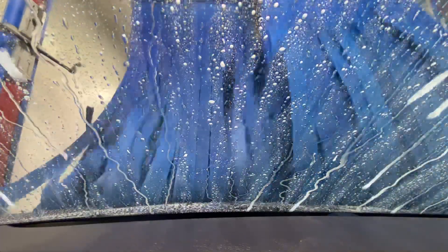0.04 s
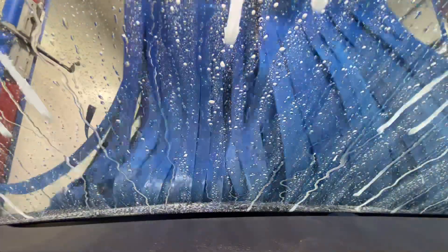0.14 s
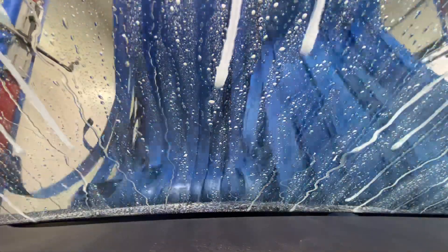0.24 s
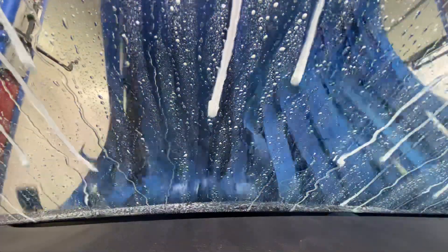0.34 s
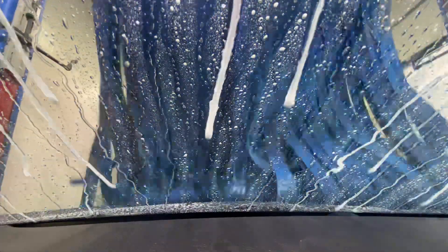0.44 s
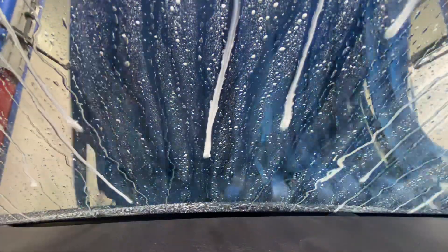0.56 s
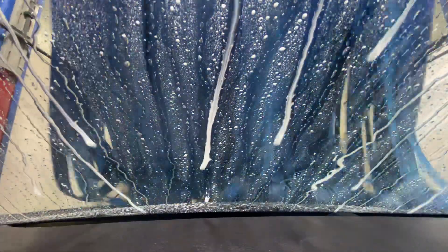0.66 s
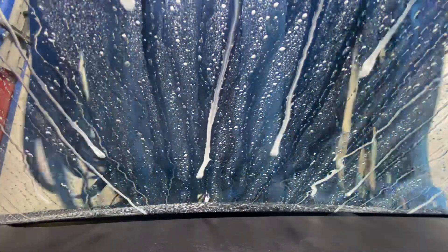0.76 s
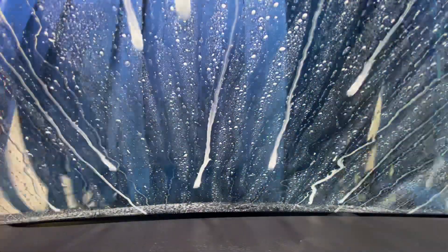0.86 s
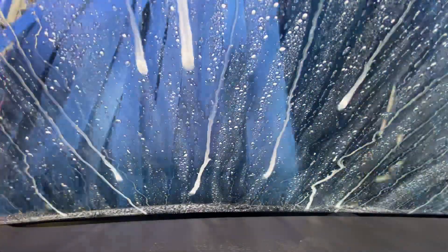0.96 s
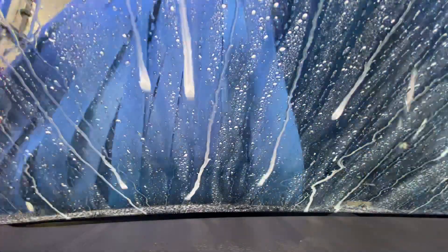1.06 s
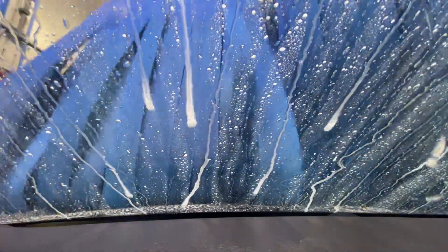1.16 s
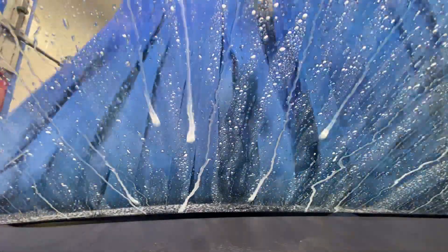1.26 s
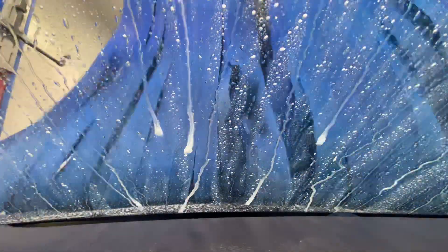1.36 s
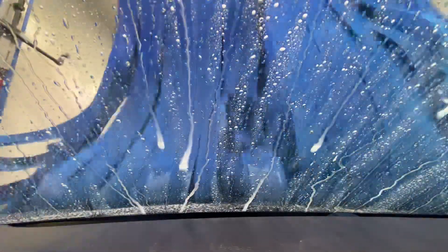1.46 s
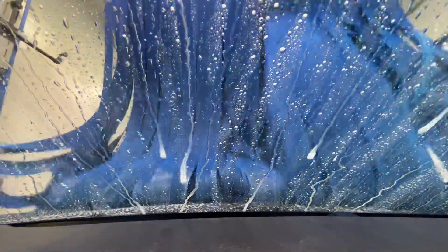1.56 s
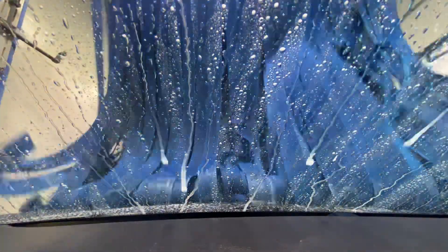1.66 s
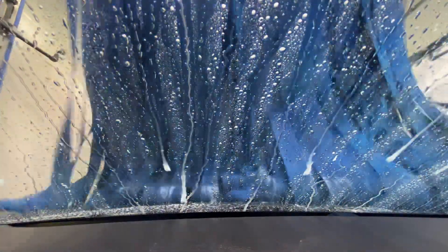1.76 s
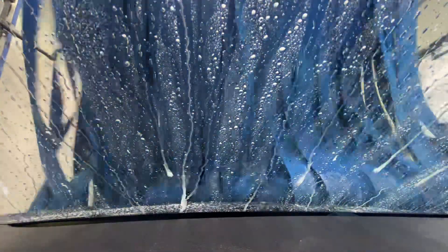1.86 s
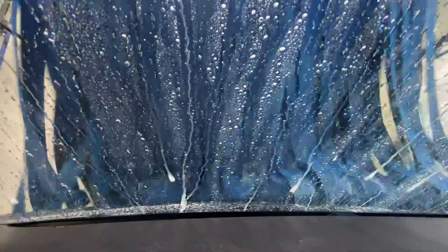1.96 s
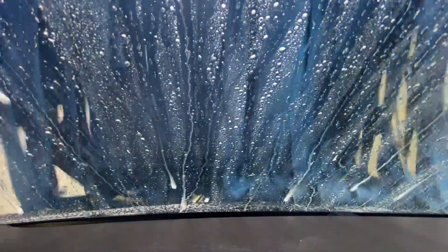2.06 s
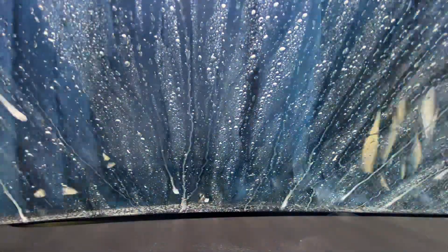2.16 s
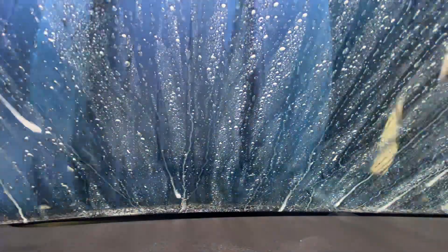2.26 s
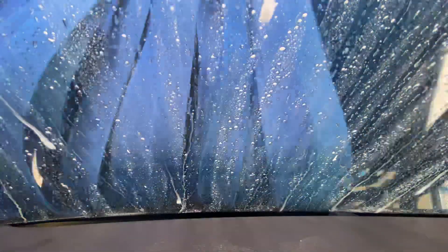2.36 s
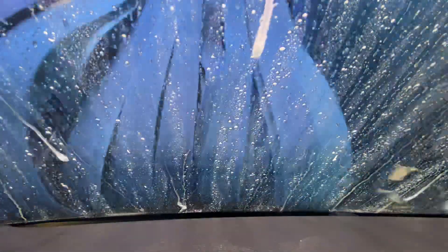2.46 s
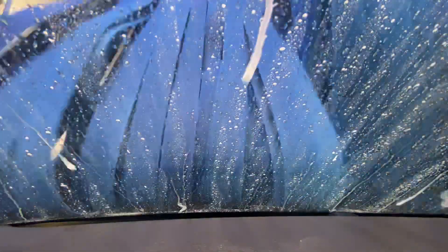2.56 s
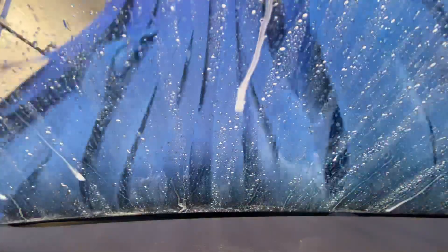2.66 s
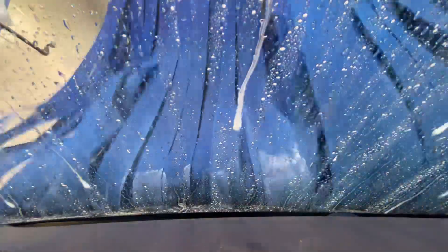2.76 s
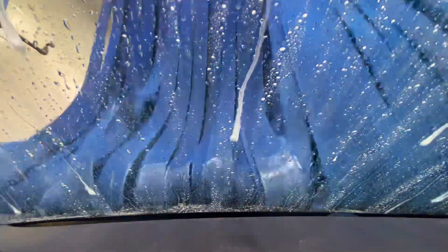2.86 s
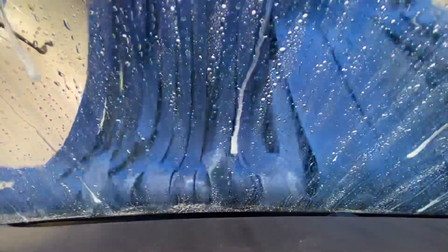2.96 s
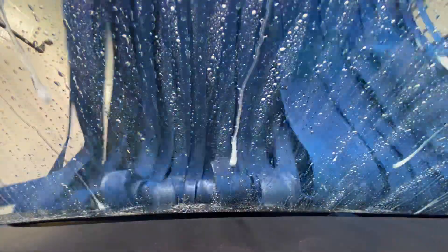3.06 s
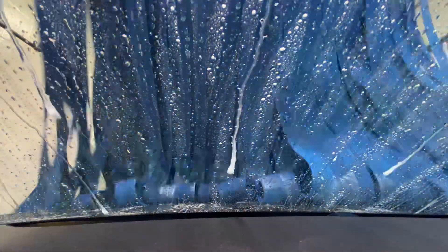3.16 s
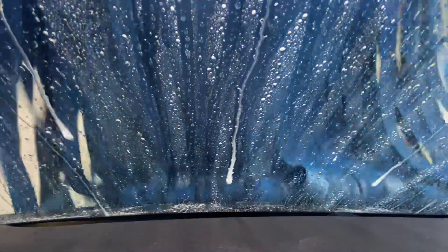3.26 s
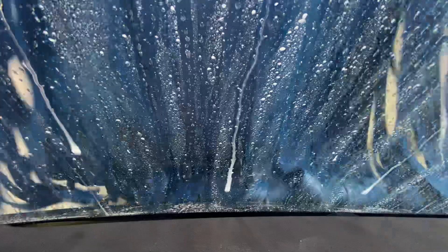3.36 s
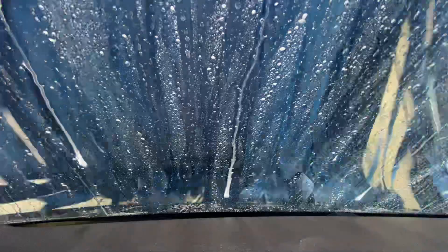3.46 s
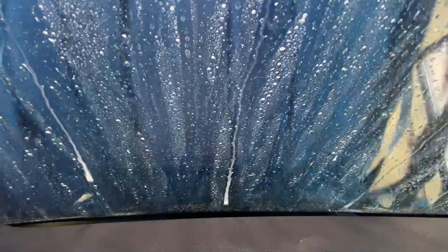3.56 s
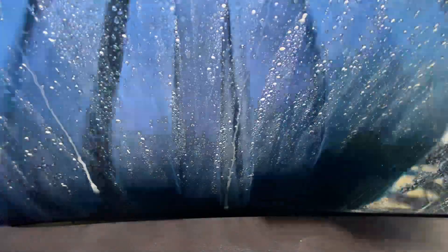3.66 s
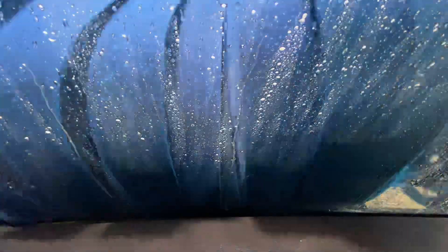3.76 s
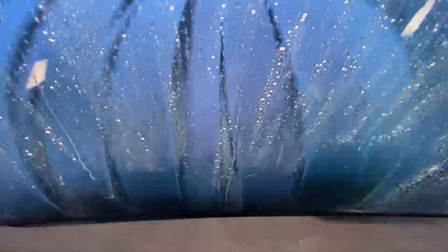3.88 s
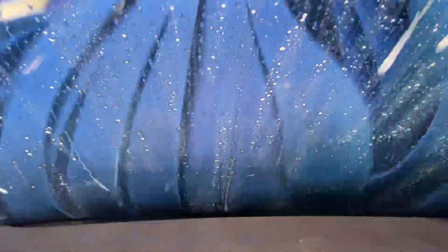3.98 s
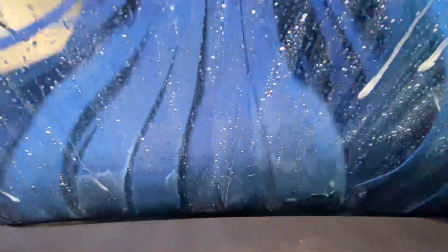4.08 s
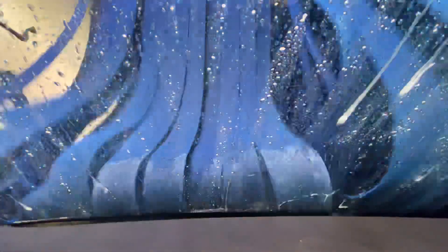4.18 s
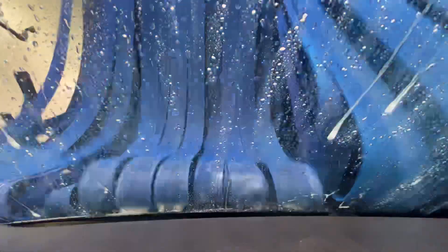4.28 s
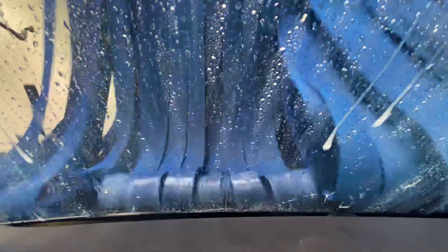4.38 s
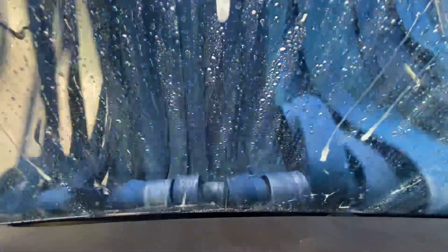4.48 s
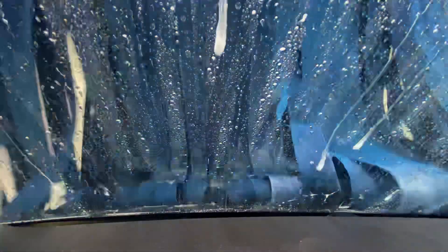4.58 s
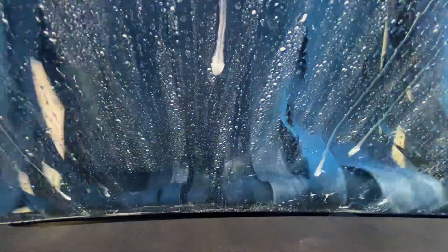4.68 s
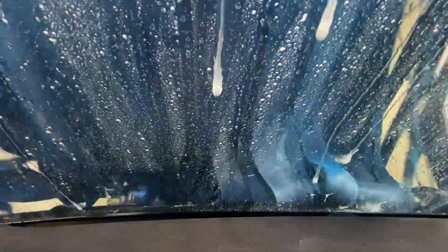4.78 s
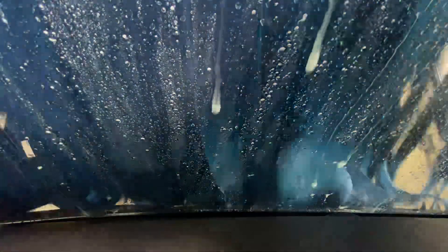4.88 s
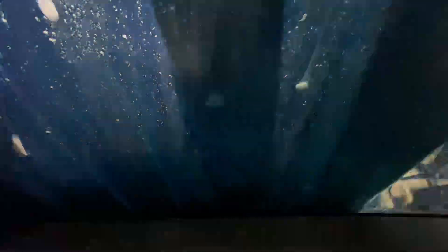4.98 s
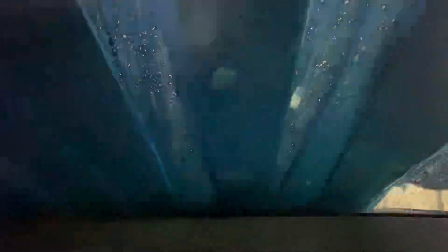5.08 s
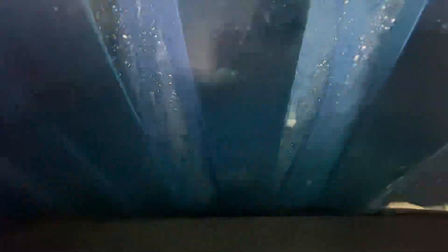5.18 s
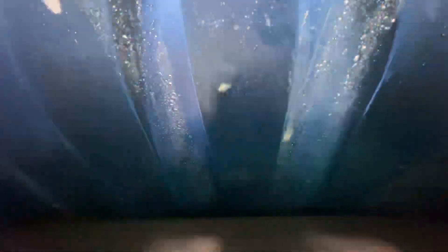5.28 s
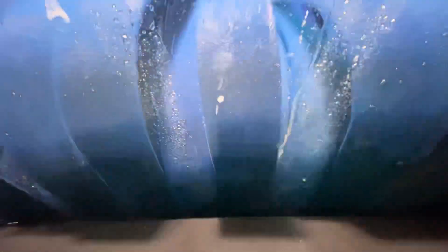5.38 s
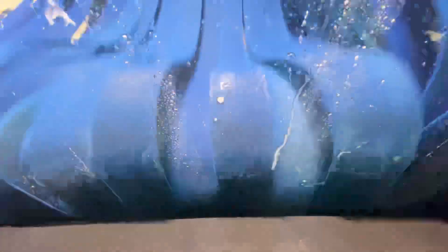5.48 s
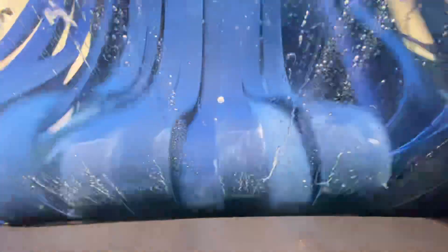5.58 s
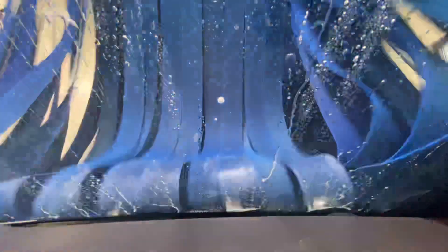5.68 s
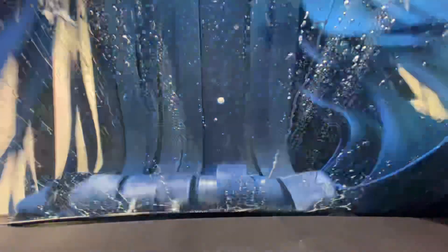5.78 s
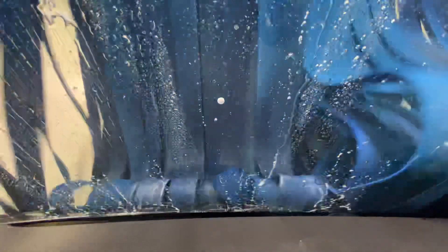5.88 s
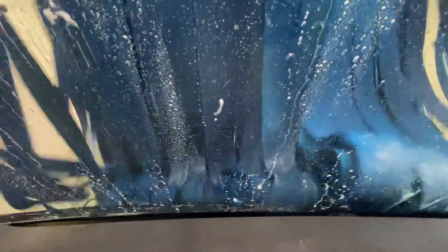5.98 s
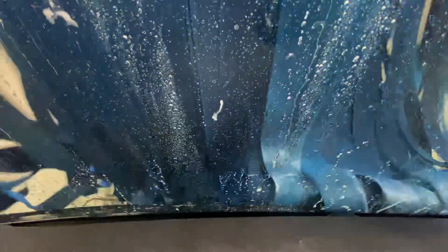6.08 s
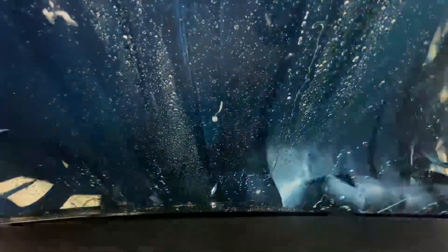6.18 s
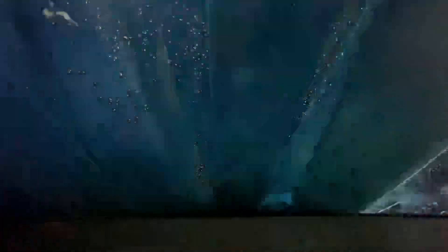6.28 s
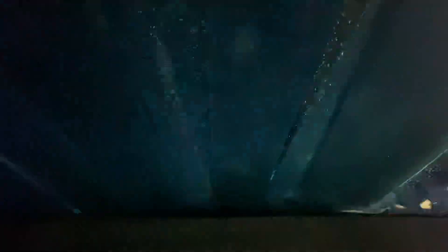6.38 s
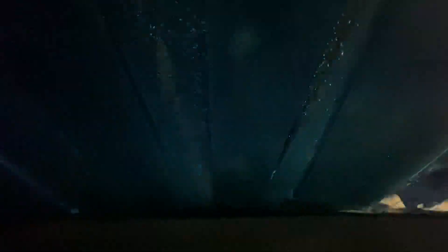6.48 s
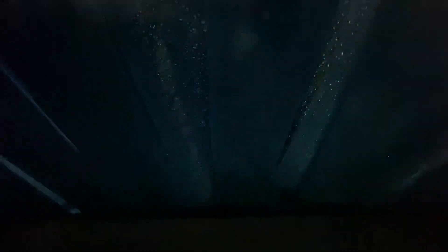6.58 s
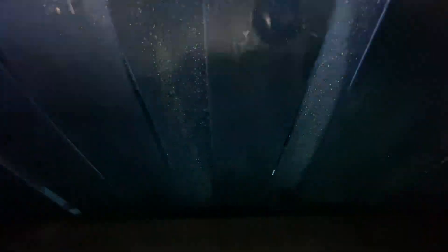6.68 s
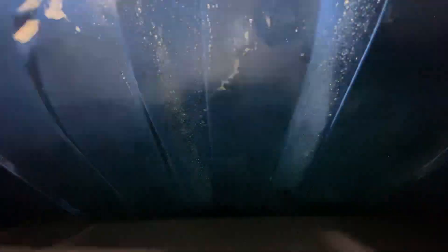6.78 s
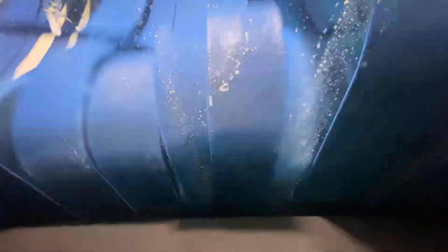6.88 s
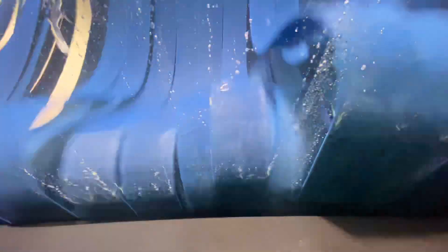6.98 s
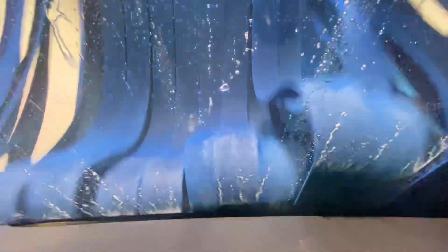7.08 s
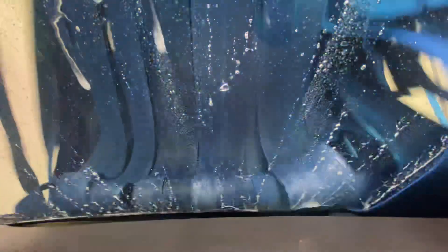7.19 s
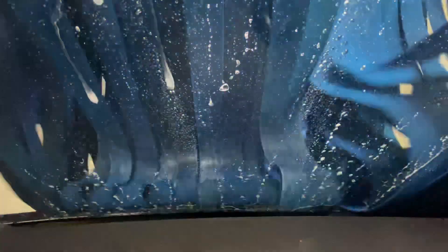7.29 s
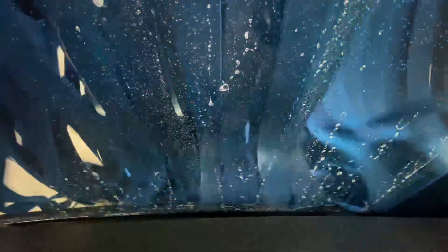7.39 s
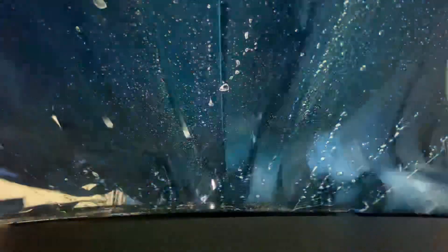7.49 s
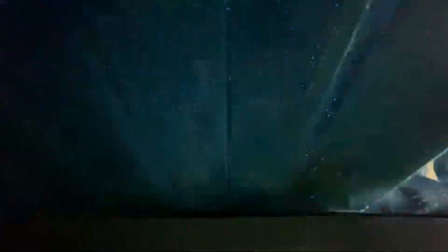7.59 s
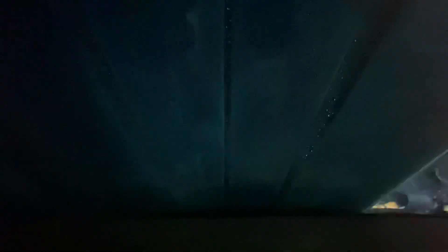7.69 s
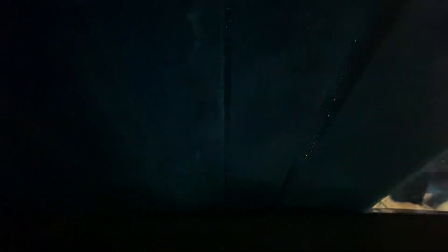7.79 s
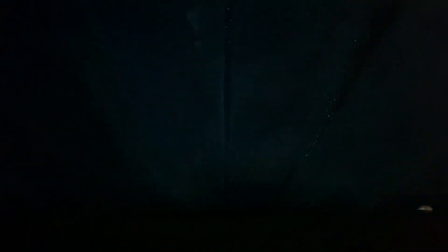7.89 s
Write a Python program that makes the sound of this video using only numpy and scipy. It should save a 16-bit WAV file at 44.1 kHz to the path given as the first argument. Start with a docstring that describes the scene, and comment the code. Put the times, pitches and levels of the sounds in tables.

```python
"""Inside a tunnel car wash

Heard from the front seat of a closed car: water drops drum and hiss on glass and roof as filtered random impacts.
A lopsided foam brush turns every 1.3 s; its vanes wipe over the car in soft waves of filtered noise.
Wet bunches of strips slap the windshield: noise bursts smack and crack, gliding tones knock, body panels ring.
Heavy bunches make the cabin boom in its air modes, and foam dragging on the glass grunts."""
import sys
import numpy as np
from scipy import signal
from scipy.fft import rfft, irfft
from scipy.io import wavfile
from scipy.ndimage import uniform_filter1d

SR = 44100
rng = np.random.default_rng(int(sys.argv[2]) if len(sys.argv) > 2 else 0)


def generate_wav(sig):
    """Save sig (samples, or channels by samples) to the path in sys.argv[1] as 16-bit PCM at SR."""
    pcm = np.round(np.clip(np.atleast_2d(sig).T, -1, 1) * 32767).astype(np.int16)
    wavfile.write(sys.argv[1], SR, pcm)


N = 350154
T = np.arange(N) / SR  # time [s]

# one turn of the brush, and a moment when its heaviest vane is on the car
TURN_S, FIRST_VANE_S = 1.308, 1.013
FIRM_SMACK_DB = -9  # table level of a firm smack
FULL_WEIGHT_S = 0.0049  # bunches well longer than this bear with full weight; one of no length has none
EDGE_S = 0.008  # the edge of a strip grazes the glass this long before its face lands


def undb(db):
    """Decibels to gain."""
    return 10 ** (np.asarray(db) / 20)


def unit(x):
    """Scale to rms 1."""
    return x / np.sqrt(np.mean(x ** 2))


def gains(table):
    """One gain curve over time for each dB column of a table."""
    s, *columns = np.transpose(table)
    return [undb(np.interp(T, s, column)) for column in columns]


def pan(db):
    """Left and right gains for a left minus right level difference."""
    return undb(np.array([[.5], [-.5]]) * db)


def across(points, size=N):
    """Values of (Hz, value) points at every bin of a spectrum, interpolated over log frequency."""
    hz, value = np.transpose(points)
    bins_hz = np.arange(size // 2 + 1) * SR / size
    return np.interp(np.log(bins_hz + 1), np.log(hz), value)


def colour(x, points, size=4096):
    """Causal minimum-phase filter with the shape of the given spectrum and unit power gain."""
    cepstrum = irfft(across(points, size) * np.log(10) / 20)
    # fold the cepstrum forward in time, so that nothing sounds ahead of its cause
    cepstrum[1:size // 2] *= 2
    cepstrum[size // 2 + 1:] = 0
    response = irfft(np.exp(rfft(cepstrum)))[:size // 2]
    response = response / np.linalg.norm(response)
    return signal.fftconvolve(x, response[None], axes=1)[:, :N]


def ports(pair):
    """Two unrelated signals become left and right: alike in the bass, opposed around 1 kHz."""
    # likeness of left and right: (frequency [Hz], correlation [-1 to 1])
    likeness = [(45, 0.31), (95, 0.81), (160, 0.65), (320, 0.72), (480, -0.4), (750, -0.49), (1300, -0.31),
                (2100, 0.072), (3300, -0.16), (4800, 0.21), (7800, -0.11), (9900, 0.56), (11500, -0.47)]
    angle = np.arcsin(np.clip(across(likeness), -.98, .98)) / 2
    spectra = rfft(pair * signal.windows.tukey(N, .001))  # very short fades at both ends
    return irfft(np.cos(angle) * spectra + np.sin(angle) * spectra[::-1], N)


def add(track, s, sound):
    """Mix a sound into a track at a time."""
    i = int(np.clip(s * SR, 0, N - 1))
    track[..., i:i + sound.shape[-1]] += sound[..., :N - i]


def fade(t60, size=SR // 2):
    """Exponential decay from 1, falling 60 dB in t60 seconds."""
    return np.exp(-np.log(1000) * T[:size] / t60)


def drops(rate, spread_db):
    """Two streams of impacts at random times, of random size and sign; rate in impacts per second."""
    hit = rng.random((2, N)) < rate / SR
    size = undb(spread_db * np.clip(rng.standard_normal((2, N)), -2, 2))
    return unit(hit * size * np.sign(rng.standard_normal((2, N))))


def ring(modes, twist, scatter_db, detune):
    """Modes struck once, each a twist of phase past the last; the place of the blow shifts strength and pitch."""
    out = 0
    chance = rng.uniform(-1.64, 1, (len(modes), 2))
    for k, ((hz, t60, db, side_db), (strength, shift)) in enumerate(zip(modes, chance)):
        decay = fade(t60)
        pitch = hz * (1 + detune * shift)
        wave = np.cos(2 * np.pi * pitch * T[:len(decay)] + k * twist)
        out = out + pan(side_db) * undb(db + scatter_db * strength) * decay * wave
    return out


def push(x, contact_s):
    """Soft foam spreads a blow over its contact time, as a half-sine of force."""
    force = np.sin(np.pi * np.minimum((T[:SR // 20] + 1 / SR) / contact_s, 1))
    return signal.fftconvolve(x, force[None] / force.sum(), axes=1)[:, :N]


def even(x, size=1400):
    """Keep the grain of a noise but iron out its swings of level over size samples."""
    return x / np.sqrt(uniform_filter1d(np.mean(x ** 2, axis=0), size) + 1e-12)


def swell(s, spread_s):
    """A round (Gaussian) rise and fall around a moment."""
    return np.exp(-.5 * ((T - s) / spread_s) ** 2)


def water(spray_db, mist_db):
    """Countless droplets drum on the glass, the finest ones hiss on top, and a nozzle's jet moves off."""
    # water reaching the car, before the trims: (time [s], spray level [dB], fine mist level [dB])
    flow = [(0, -46, -55.5), (2, -45.5, -55.5), (4.8, -45, -55.5), (6.1, -45.5, -56.5), (6.7, -48, -58),
            (7.4, -47.5, -56.5), (7.94, -48, -62.5)]
    # a nozzle that aims at the windshield and moves off: (time [s], level [dB])
    nozzle_path = [(0, -45), (.7, -48), (1.6, -51.5), (3, -52.5), (6, -52.5), (6.7, -54)]
    # spectra of the coarse drops, the fine ones and the jet: (frequency [Hz], level [dB])
    spray_spectrum = [(150, 9.5), (400, 11.5), (700, 7.5), (1100, 4), (1700, 1.5), (2500, -4.5), (3600, 2),
                      (5000, -4.5), (6500, -10), (8000, -13.5), (11000, -27), (12000, -50)]
    mist_spectrum = [(3000, -11), (6000, -2.5), (8000, -4.5), (9800, -5), (11000, -7), (11600, -19.5),
                     (12200, -36), (15500, -25)]
    jet_spectrum = [(1200, -14), (2200, -2.5), (2900, 1), (3800, -6.5), (6000, -10), (11000, -39.5)]
    # the water is louder on the left over most of the range: (frequency [Hz], left minus right [dB])
    side = [(300, -0.5), (1200, 3.5), (2400, 3.5), (4400, 6.5), (6500, 8.5), (8500, -1), (10500, -1.5)]
    spray, mist = gains(flow)
    nozzle, = gains(nozzle_path)
    coarse = spray * undb(spray_db) * colour(drops(rate=9000, spread_db=2.5), spray_spectrum)
    fine = mist * undb(mist_db) * colour(drops(rate=22000, spread_db=5.5), mist_spectrum)
    jet = nozzle * colour(drops(rate=12000, spread_db=4.0), jet_spectrum)
    stereo = ports(coarse + fine + jet)
    return irfft(rfft(stereo) * pan(across(side)), N)


def vanes():
    """Drumming and swish levels: each vane in turn wipes over the car, rising fast and trailing off."""
    # foam vanes in their order round the shaft, before the trims:
    # (time behind the heaviest [s], drumming level [dB], wet swish level [dB])
    shaft = [(0, -28, -41.5), (0.284, -29.5, -45), (.65, -36.5, -54)]
    attack_s, release_s = 0.046, 0.094  # Gaussian spreads
    drum, swish = 0, 0
    for delay_s, drum_db, swish_db in shaft:
        since = (T - FIRST_VANE_S - delay_s + TURN_S / 2) % TURN_S - TURN_S / 2
        wipe = np.exp(-.5 * (since / np.where(since < 0, attack_s, release_s)) ** 2)
        drum = drum + undb(drum_db) * wipe
        # the water is wiped off sooner than the foam leaves
        swish = swish + undb(swish_db) * wipe ** 3
    return drum, swish


def lean(swing_db, lag_s):
    """The lopsided brush leans on the car once a turn: a gain that swells lag_s behind the heaviest vane."""
    return undb(swing_db * np.cos(2 * np.pi * (T - FIRST_VANE_S - lag_s) / TURN_S))


def brush(patter_db, rumble_db, drum_db, swish_db):
    """Limp strips patter all the time, drum and swish over the roof in waves, and shake the body."""
    # how hard the brush bears on the car: (time [s], level [dB])
    bearing = [(0, -0.5), (1.1, 0.5), (2.4, 2), (3.25, -1.5), (3.8, 4), (4.6, -1), (5.5, 6), (6.4, -2),
               (7.2, 5.5), (7.94, -2)]
    # spectra of limp taps, drumming foam, wet swish and shaking body: (frequency [Hz], level [dB])
    patter_spectrum = [(40, -25.5), (80, 1), (125, 1), (200, 2.5), (270, -6), (350, -7), (480, -9.5),
                       (650, -15), (1000, -27), (1600, -32), (3000, -48), (8000, -68)]
    drum_spectrum = [(50, -27), (90, 4), (125, 6.5), (200, -6), (320, -4.5), (550, -16.5), (1000, -32),
                     (8000, -78)]
    swish_spectrum = [(200, -13), (550, 8.5), (1100, -1), (1700, -10.5), (3000, -6), (6000, -26),
                      (11000, -56)]
    rumble_spectrum = [(15, -10), (28, 22.5), (42, -20), (58, 14), (76, 6), (105, 1.5), (150, -7),
                       (1000, -85)]
    pressure, = gains(bearing)
    waves, wipes = vanes()
    # each strip drags for a moment after it lands
    landings = drops(rate=260, spread_db=-1.5)[0] ** 2
    drag = np.sqrt(np.abs(signal.fftconvolve(landings, fade(t60=0.05))[:N]))
    taps, drumming, swish = (colour(unit(drag * rng.standard_normal((2, N))), spectrum)
                             for spectrum in (patter_spectrum, drum_spectrum, swish_spectrum))
    strips = lean(swing_db=1.5, lag_s=0.12) * undb(patter_db) * taps
    strips = strips + waves * undb(drum_db) * even(drumming)
    strips = strips + wipes * undb(swish_db) * swish
    shaking = colour(rng.standard_normal((2, N)), rumble_spectrum)
    shake = lean(swing_db=3, lag_s=0.41) * undb(rumble_db) * shaking
    return pressure * (ports(strips) * pan(2.1) + ports(shake) * pan(3.4))


def blows():
    """All slaps and pats as rows of one shape; a limp pat has next to no crack, and a low air pocket."""
    # bunches of strips slapping the windshield, levels before the trims: (time [s], length [s],
    # wet smack [dB], sharp crack [dB], knock [dB], knock pitch [Hz], air pocket [Hz])
    slap_rows = [(1.262, 0.045, -24.5, -41, -29.5, 288, 1300), (3.591, 0.0022, -20, -58, -13.5, 290, 1000),
                 (3.648, 0.017, -27, -50, -19.5, 480, 2400), (4.859, 0.00094, -20, -37, -20.5, 329.7, 1100),
                 (4.884, 0.0044, -15, -26, -12.5, 123, 620), (4.917, 0.001, -29, -45, -16.5, 119, 700),
                 (4.926, 0.0047, -14.5, -32, -15.5, 150, 3020), (5.217, 0.0057, -16, -31, -18, 302, 2700),
                 (5.229, 0.0013, -8.5, -21.5, -21.5, 333, 2100),
                 (5.236, 0.016, -14.5, -40, -16.5, 282, 846), (5.568, 0.016, -22, -43, -23, 340, 2580),
                 (6.199, 0.00089, -1.5, -16, -5.5, 161.9, 2020),
                 (6.230, 0.0024, -13, -23.5, -15.5, 282, 2600), (6.245, 0.006, -12, -29, -9.5, 218.7, 3000),
                 (6.276, 0.0013, -24, -50, -36, 270, 1502), (6.517, 0.0065, -11, -27, -17.5, 279, 2500),
                 (6.537, 0.004, -8, -29, -11.5, 325, 2550), (6.547, .006, -8.5, -17, -15, 327, 2400),
                 (6.562, 0.0054, -10, -39, -10.5, 400, 2470), (7.096, 0, -17.5, -32.5, -15, 282, 617),
                 (7.261, 0.017, -23, -44, -31, 300, 2300), (7.543, 0.0045, -13.5, -23, -10, 150, 3500),
                 (7.552, 0.0011, -13, -26, -9.5, 170, 2800), (7.560, 0.0008, -22, -28, -12, 323, 3480),
                 (7.568, 0, -6.5, -13.5, -24, 350, 2200), (7.572, 0.0017, -11, -18.5, -17, 424, 4700),
                 (7.652, 0.013, -27, -52, -28, 347, 2190), (7.864, .002, -10.5, -25.5, -13.5, 343, 800),
                 (7.872, .007, -11.5, -22.5, -14, 363, 3600), (7.904, 0.0034, -19, -31, -17, 233, 1600)]
    # limp strips patting the roof and glass between the slaps, levels before the trims:
    # (time [s], length [s], wet smack [dB], knock [dB], knock pitch [Hz])
    pat_rows = [(0.06, 0.055, -34.5, -27, 131), (0.969, 0.017, -31, -36, 402),
                (1.034, 0.0074, -26.5, -28.5, 337), (1.3, .08, -39, -31.5, 247),
                (1.645, .05, -35, -37, 420), (2.325, .03, -30, -25.5, 359),
                (2.36, 0.071, -37.5, -30.5, 151), (2.605, .018, -36, -30.5, 300.7),
                (2.841, 0.0077, -35, -32.5, 379.3), (2.985, 0.017, -35, -36, 400),
                (3.858, .004, -34, -25, 110), (3.88, 0.011, -44, -34, 330), (3.997, 0.011, -29, -29.5, 280),
                (4.032, 0.0022, -44, -18.5, 99), (4.173, 0.028, -29, -28, 340),
                (4.354, 0.0039, -27, -31, 400), (5.31, 0.019, -39, -26, 480),
                (5.481, 0.017, -38, -26.5, 398), (5.675, .018, -32, -31.5, 479),
                (6.292, .003, -41, -12.5, 100), (6.477, 0.0021, -29, -39, 400),
                (6.958, 0.085, -40, -31, 400), (7.412, .002, -42, -30, 218)]
    pocket_hz, crack_db = 720, -28  # air pocket under a limp strip; its crack relative to its smack
    pats = [(s, length_s, wet_db, wet_db + crack_db, blow_db, hz, pocket_hz)
            for s, length_s, wet_db, blow_db, hz in pat_rows]
    return slap_rows + pats


def bunch(length_s):
    """The strips of a bunch land one after another, the middle ones hardest: (delay s, gain) for each."""
    strip_gap_s = .009
    count = 1 + int(round(abs(length_s) / strip_gap_s))
    delays = np.linspace(0, length_s, count)
    return zip(delays, np.sin(np.pi * np.arange(1, count + 1) / (count + 1)))


def wet_spectrum(wet_db, pocket_hz):
    """A smack is duller the softer it lands, and peaks where the air trapped under the strip resonates."""
    # spectrum of a firm smack before the tilt: (frequency [Hz], level [dB])
    smack_spectrum = [(250, -5), (600, 8.5), (950, 2), (1450, -2.5), (2000, -2.5), (2600, -2), (3300, -8.5),
                      (5000, -23), (10000, -53)]
    dulling = 0.19  # dB per octave lost for each dB softer than a firm smack
    pocket_db, pocket_octaves = 5.5, 0.32  # height and Gaussian spread of the air resonance
    hz = np.geomspace(200, 10000, 18)
    points_hz, points_db = np.transpose(smack_spectrum)
    plain = np.interp(np.log(hz), np.log(points_hz), points_db)
    tilt = dulling * (wet_db - FIRM_SMACK_DB) * np.log2(hz)
    pocket = pocket_db * np.exp(-.5 * (np.log2(hz / pocket_hz) / pocket_octaves) ** 2)
    return list(zip(hz, plain + tilt + pocket))


def splat(spectrum, splash_db, contact_s, size=SR // 6):
    """A strip grazes the glass, bursts the water film and throws a short, fluttering splash."""
    burst_s, splash_s = 0.0066, 0.066  # t60 of the bursting film and of its splash
    graze = undb(-20.5) * np.linspace(0, 1, int(EDGE_S * SR))
    decay = fade(burst_s, size) + undb(splash_db) * fade(splash_s, size)
    burst = decay * (1 - fade(contact_s, size))
    envelope = np.concatenate([graze, burst])[:size]
    flutter = undb(3.5 * unit(uniform_filter1d(rng.standard_normal(size), size=80)))
    # trapped air colours each burst anew
    pockets = [(hz, db + 2.5 * rng.uniform(-1, 1)) for hz, db in spectrum]
    return colour(envelope * flutter * rng.standard_normal((2, size)), pockets)


def knock(hz, firmness, overtone_db, size=SR // 6):
    """The struck patch of glass or roof bends and springs back for a few cycles, in pairs of close plate modes."""
    start_hz, glide_s = 590, 0.00397
    cycles = 13  # the lowest mode falls 60 dB in this many cycles of its final pitch
    # bending waves arrive treble first, so a firm knock glides down to its pitch
    pitch = hz + firmness * (start_hz - hz) * np.exp(-T[:size] / glide_s)
    turns = np.array([[1], [1.1]]) * np.cumsum(pitch) / SR
    wave = 0
    for k, (ratio, sense) in enumerate([(1, 1), (1.6, 1), (2.4, -1), (3.5, -1)]):
        own = turns * ratio * rng.uniform(.96, 1.04)
        # the higher modes rock the plate, so its two sides move against each other
        shape = (-1) ** k * np.array([[1], [sense]])
        decay = fade(cycles / hz / np.sqrt(ratio), size)
        wave = wave + shape * undb(k * overtone_db) * np.sin(2 * np.pi * own) * decay
    return wave * (1 - np.exp(-4 * turns))


def slaps(smack_db, crack_db, knock_db, panel_db):
    """A wet strip smacks and cracks on the glass, knocks it in, and sets the body panels ringing."""
    # spectrum of the sharp crack: (frequency [Hz], level [dB])
    crack_spectrum = [(1500, -21), (3000, 4.5), (4700, 5.5), (6200, -4), (8000, -13.5), (10500, -16.5),
                      (12500, -42), (15500, -47)]
    # windshield and roof modes: (frequency [Hz], t60 [s], level [dB], left minus right [dB])
    panel_modes = [(115, 0.31, 1.5, 15.5), (152, 0.065, 2, -15.5), (189, 0.2, 6, 7), (243.5, 0.088, 6, 1),
                   (292.4, 0.13, 5.5, 1), (336, 0.04, 0, -15), (457.5, 0.1, -2.5, 5), (553, 0.062, 3, -5)]
    firm_contact_s, softening = 0.0033, 0.66  # softer strips settle more slowly, by this power of strength
    sag_octaves, sag_s = 0.81, 0.025  # foam piling on the glass lowers its knock
    lone_strip_db = -0.5  # a lone strip knocks dryly: it rings the panels less than a full bunch
    smacks, cracks, knocks, panels = np.zeros((4, 2, N))
    for s, length_s, wet_db, sharp_db, blow_db, hz, pocket_hz in blows():
        wet = wet_spectrum(wet_db, pocket_hz)
        ring_db = blow_db + panel_db + lone_strip_db * np.exp(-2 * abs(length_s) / FULL_WEIGHT_S)
        contact_s = firm_contact_s * undb(softening * (FIRM_SMACK_DB - wet_db))
        firmness = min(firm_contact_s / contact_s, 1)
        for delay, gain in bunch(length_s):
            landing = s + delay
            pitch = hz * 2 ** (-sag_octaves * (1 - np.exp(-delay / sag_s)))
            smack = splat(wet, splash_db=-5.0, contact_s=contact_s)
            crack = splat(crack_spectrum, splash_db=-10.0, contact_s=contact_s)
            thump = knock(pitch, firmness, overtone_db=-5.5)
            ringing = ring(panel_modes, twist=np.pi, scatter_db=9.0, detune=0.043)
            add(smacks, landing - EDGE_S, gain * undb(wet_db + smack_db) * smack)
            add(cracks, landing - EDGE_S, gain * undb(sharp_db + crack_db) * crack)
            add(knocks, landing, gain * undb(blow_db + knock_db) * thump)
            add(panels, landing, gain * undb(ring_db) * ringing)
    on_glass = ports(smacks * pan(1.0) + cracks * pan(5.8) + knocks * pan(1.0))
    return on_glass + push(panels, contact_s=0.00081)


def bumps(thud_db, slap_db):
    """A heavy bunch of foam presses the roof or the glass in, and the air in the cabin booms."""
    # heavy bunches of foam landing on the roof, before the trim: (time [s], level [dB])
    thuds = [(1.106, -20.5), (2.42, -18.5), (4.203, -11), (4.285, -19), (4.93, -16.5), (5.261, -12.5),
             (5.579, -12.5), (5.712, -12.5), (6.307, -19), (6.57, -15.5), (6.702, -19), (6.97, -15.5),
             (7.02, -20.5), (7.893, -12)]
    # air modes of the cabin: (frequency [Hz], t60 [s], level [dB], left minus right [dB])
    cabin_modes = [(65.4, 0.033, -21, -6), (73.9, 0.49, 2.5, 8.5), (85.7, 0.1, 6, 3),
                   (107, 0.24, -5.5, -11), (142, 0.14, -14.5, -5)]
    air = np.zeros((2, N))
    on_roof = [(s, undb(db + thud_db)) for s, db in thuds]
    on_glass = [(s + length_s / 2, undb(blow_db + slap_db) * np.tanh(length_s / FULL_WEIGHT_S))
                for s, length_s, _, _, blow_db, _, _ in blows()]
    for s, weight in on_roof + on_glass:
        add(air, s, weight * ring(cabin_modes, twist=0, scatter_db=4.5, detune=0.042))
    return push(push(air, contact_s=0.0077), contact_s=0.0018)


def rubs(wobble):
    """Wet foam sticks and slips on the glass for a few cycles: a short hollow grunt."""
    # foam juddering as it drags: (middle [s], Gaussian spread [s], slips per second [Hz], level [dB])
    drags = [(4.199, 0.017, 345, -19.5), (4.291, 0.0066, 320, -22), (5.605, 0.013, 340, -25.5),
             (6.554, 0.014, 350, -12), (6.972, .012, 369, -27.5), (7.875, 0.0047, 344, -8)]
    out = 0
    for s, spread_s, hz, db in drags:
        unrest = unit(uniform_filter1d(rng.standard_normal(N), size=300))
        phase = 2 * np.pi * np.cumsum(hz * (1 + wobble * unrest)) / SR
        out = out + undb(db) * swell(s, spread_s) * np.sin(phase)
    return out


def windshield(x):
    """All that lands outside comes through the glass and picks up its resonances."""
    # hollow resonances of the windshield: (centre [Hz], width [Hz], level over the plain sound [dB])
    resonances = [(362.6, 63, -7.5), (455, 18, -6), (742, 28, -7), (1008, 34, -2), (1118, 36, -5),
                  (1440, 45, -4), (1590, 36, -7), (1940, 70, -6)]
    hz = np.arange(N // 2 + 1) * SR / N
    response = 1 + sum(undb(db) / (1 + 2j * (hz - centre) / width) for centre, width, db in resonances)
    return irfft(rfft(x) * response, N)


def scene():
    """Water, sweeping brush and its blows, heard from the front seat."""
    outside = water(spray_db=3.0, mist_db=2.5)
    outside = outside + brush(patter_db=-39.5, rumble_db=-37.5, drum_db=-1.5, swish_db=-1.0)
    outside = outside + slaps(smack_db=-2.0, crack_db=0.5, knock_db=0.23, panel_db=-13)
    return windshield(outside) + rubs(wobble=0.0383) + bumps(thud_db=-6.5, slap_db=-8.0)


def record(dry):
    """The phone's microphone drops the deepest bass, rounds the loudest peaks and cuts the top."""
    low_hz, top_hz = 38, 15700
    thinned = signal.sosfilt(signal.butter(3, low_hz, "high", fs=SR, output="sos"), dry)
    rounded = np.tanh(thinned)
    return signal.sosfilt(signal.ellip(8, .2, 70, top_hz, fs=SR, output="sos"), rounded)


dry = scene()
out = record(dry)
generate_wav(out)
```